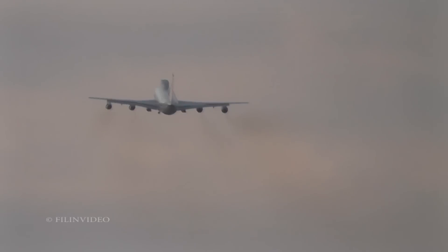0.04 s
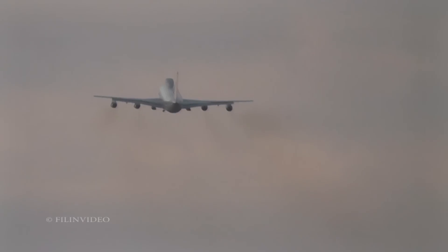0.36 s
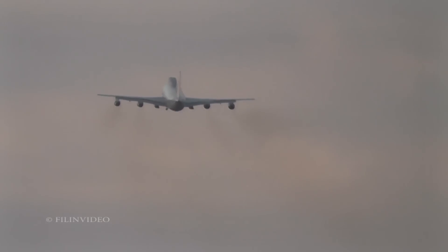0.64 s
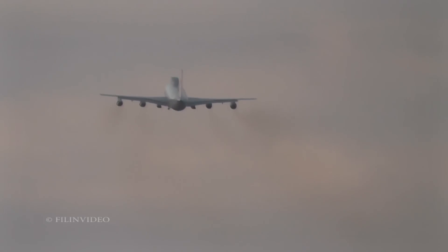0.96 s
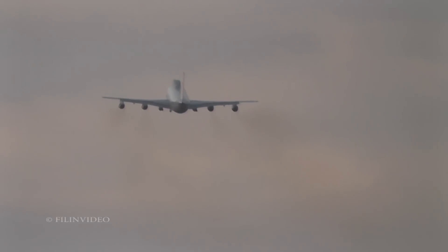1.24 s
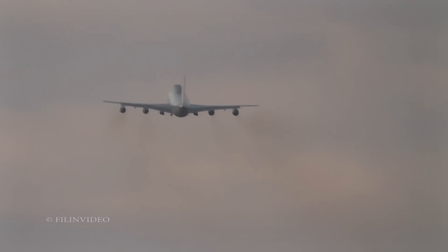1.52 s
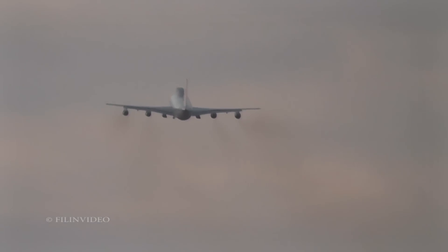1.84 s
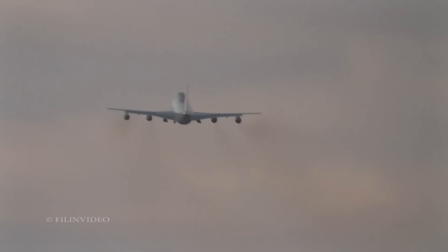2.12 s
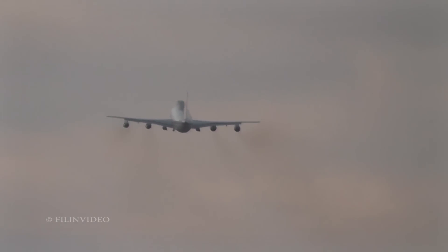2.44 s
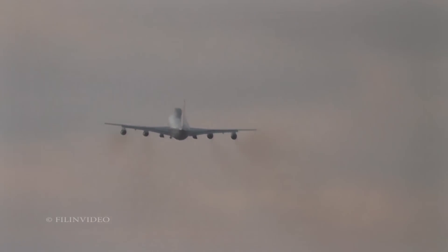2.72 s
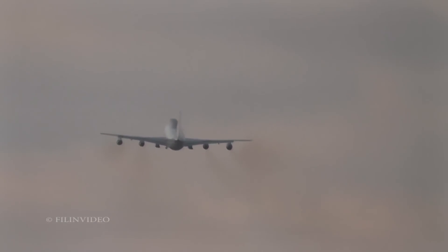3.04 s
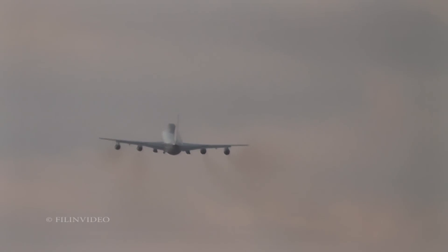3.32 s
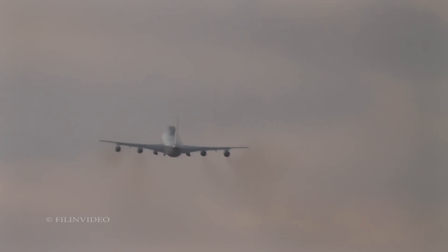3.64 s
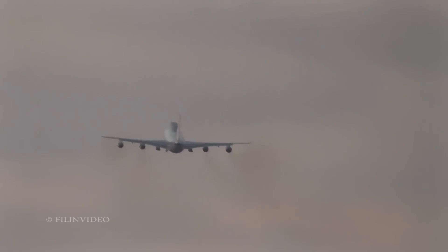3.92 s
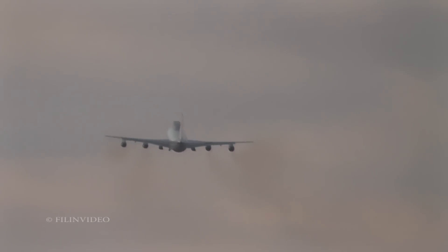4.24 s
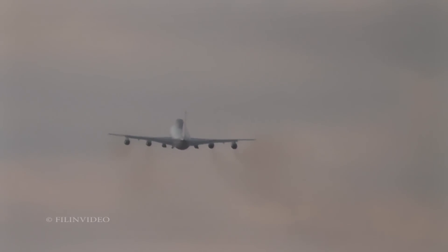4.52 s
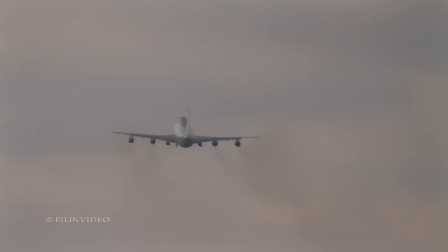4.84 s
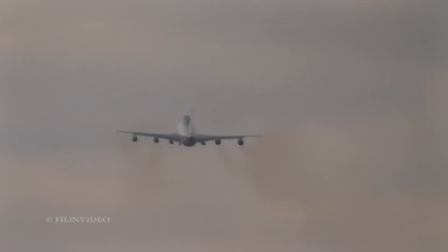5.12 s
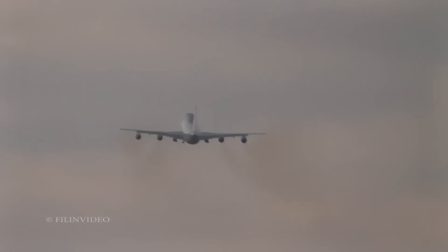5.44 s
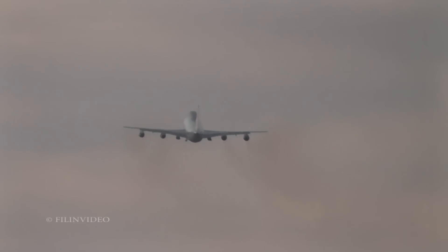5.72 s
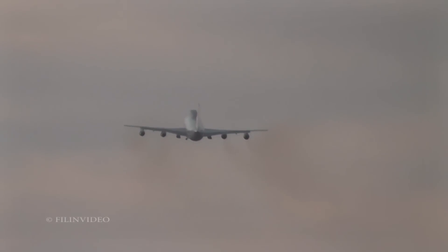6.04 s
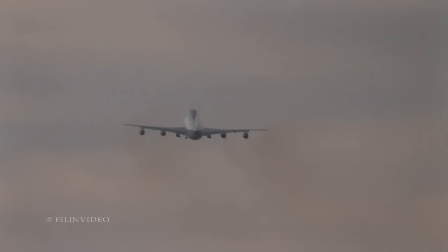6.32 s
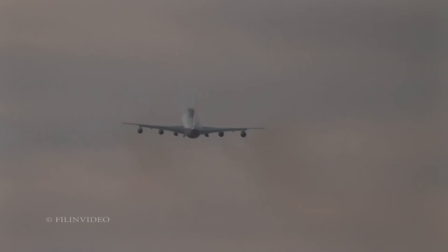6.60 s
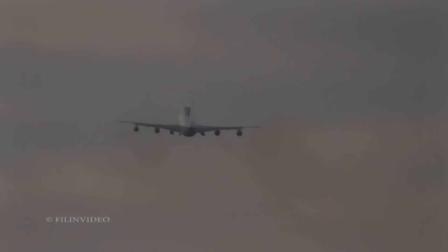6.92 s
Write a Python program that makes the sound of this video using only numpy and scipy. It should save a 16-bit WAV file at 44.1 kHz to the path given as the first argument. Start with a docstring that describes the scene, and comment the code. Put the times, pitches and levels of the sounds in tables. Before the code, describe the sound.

Gusts thump the microphone as a far-off airliner climbs away, its low roar and hollow howls gradually fading.

```python
"""A four-engine jet climbs away, far off: its exhausts mix with the air, rumbling and slowly receding.
Hollow howls swell out of the roar, and late in the climb thin turbine whines come through.
Gusts of wind buffet the two microphones. Beside them a camcorder's motor buzzes, ticking its casing
once a turn, over a faint hiss. The whole sound fades down at the end."""
import sys
import numpy as np
from scipy import signal
from scipy.fft import rfft, irfft, next_fast_len
from scipy.io import wavfile
from scipy.ndimage import uniform_filter1d, map_coordinates

SR = 44100
rng = np.random.default_rng(int(sys.argv[2]) if len(sys.argv) > 2 else 0)


def output_pcm(signal):
    """Save a mono or channel-first signal as 16-bit PCM at the path in sys.argv[1].

    Samples are clipped to [-1, 1] before scaling.
    """
    pcm = np.clip(np.atleast_2d(signal).T, -1, 1) * 32767
    wavfile.write(sys.argv[1], SR, np.round(pcm).astype(np.int16))


N = 307377
TIME = np.arange(N) / SR
FREQ = np.maximum(np.fft.rfftfreq(2 * next_fast_len(N // 2 + 1), 1 / SR), 1)


def undb(db):
    """Turn decibels into a number to multiply by."""
    return 10 ** (np.asarray(db) / 20)


def unit(x):
    """Scale a signal to an average (rms) size of 1."""
    return x / np.sqrt(np.mean(x ** 2))


def over_time(rows):
    """Read a (time, value) table at every sample."""
    return np.interp(TIME, *np.transpose(rows))


def over_frequency(rows):
    """Read a (frequency, value) table at every frequency."""
    hz, value = np.transpose(rows)
    return np.interp(np.log(FREQ), np.log(hz), value)


def colour(rows):
    """Make a filter from a (frequency, level) table, falling steeply beyond its ends."""
    outside = np.minimum(FREQ / rows[0][0], 1) * np.minimum(rows[-1][0] / FREQ, 1)
    return undb(over_frequency(rows)) * outside ** 4


def resonance(hz, width_hz):
    """A filter that rings at one pitch: the narrower, the longer."""
    return 1 / (1 + 1j * (FREQ ** 2 - hz ** 2) / (FREQ * width_hz))


def filtered(x, response):
    """Pass a sound through a filter."""
    return irfft(rfft(x, 2 * (len(FREQ) - 1)) * response)[..., :N]


def noise(stereo=False):
    """White noise; in stereo each side gets its own."""
    return rng.standard_normal((2, N) if stereo else N)


def wander(rate_hz):
    """A smooth random wobble of size 1 that changes about rate_hz times a second."""
    return unit(filtered(noise(), 1 / (1 + (FREQ / rate_hz) ** 2) ** 2))


def envelope(start_s, length_s, rise_s, fall_s):
    """Rise from 0 to 1, hold, and fall back to 0 at the end of the length."""
    return np.clip(np.minimum((TIME - start_s) / rise_s, (start_s + length_s - TIME) / fall_s), 0, 1)


def swells(rows, rise_s, fall_s):
    """Add up (start, length, level) rows into one loudness curve."""
    return sum(undb(db) * envelope(start, length, rise_s, fall_s) for start, length, db in rows)


def hiss():
    """Faint hiss with short swells of high fizz, both partly shared by the two microphones."""
    # tone colours of the hiss and the fizz: (frequency [Hz], level [dB])
    hiss_colour = [(2000, 2), (6000, 2.5), (7700, -4.5), (8500, 1), (9500, -5.5), (10500, -19),
                   (13000, -15), (15500, -19)]
    fizz_colour = [(5500, -14.5), (8000, 7), (9200, 3), (10800, -13), (14000, -15)]
    # swells of fizz: (start [s], length [s], level [dB])
    fizzes = [(0.18, 0.65, -68), (1.42, 0.4, -69), (1.93, 0.55, -60.5), (3.1, 0.45, -67)]
    steady = unit(filtered(noise(stereo=True) + noise(), colour(hiss_colour)))
    fizz = unit(filtered(noise(stereo=True) + noise(), colour(fizz_colour)))
    return steady * undb(-58.5) + fizz * swells(fizzes, rise_s=0.11, fall_s=0.2)


def ringing(x, modes):
    """A shaken object rings at its own pitches (modes) and gives off little outside their range."""
    body = sum(undb(db) * resonance(hz, width) for hz, width, db in modes)
    band = colour([(modes[0][0], 0), (modes[-1][0], 0)]) ** 2
    return unit(filtered(x, body * band))


def bearing(phase, pressure, turn_samples):
    """The motor's bearing rubs: it rasps, rings small parts, and shimmers in one narrow band."""
    # ringing of the camcorder's small parts: (pitch [Hz], width [Hz], level [dB])
    part_modes = [(2785, 30, -6.5), (2974, 26, -3.5), (3090, 42, -0.5), (3282, 60, -2.5), (3350, 70, -5),
                  (3635, 22, -2), (3790, 30, -4), (4130, 60, 0), (4205, 50, -2), (4340, 50, -4.5),
                  (4405, 60, -2), (4660, 140, -6), (4898, 20, -0.5), (5315, 18, -5), (5440, 30, -7),
                  (6490, 50, -11)]
    # tone colours of the broad rasp and its shimmer: (frequency [Hz], level [dB])
    rasp_colour = [(1400, -44), (1700, 6.5), (2080, 2.5), (2250, -2), (2650, -1), (2850, 0.5), (3400, -0.8),
                   (4000, -2.5), (4250, -8.5), (4750, -5), (5150, -8), (6700, -10), (7600, -20),
                   (10500, -31)]
    shimmer_colour = [(3950, -28), (4120, 0), (4260, -1), (4420, 0), (4580, -26)]
    # moments when the shimmer flares: (start [s], length [s], level [dB])
    flares = [(0.28, 0.17, -55), (0.72, 0.18, -55), (1.55, 0.16, -55), (1.89, 0.25, -52),
              (2.46, 0.11, -54.5), (3.24, 0.17, -58), (4.44, 0.094, -53)]
    # the same rough track passes on every turn, so part of the rasp repeats
    track = rng.standard_normal(turn_samples)
    repeating = map_coordinates(track, [phase * turn_samples], mode="grid-wrap")
    rub = unit(pressure * (noise() + 0.51 * repeating))
    parts = ringing(rub, part_modes) * undb(-51)
    rasp = unit(filtered(rub, colour(rasp_colour))) * undb(-45.5)
    shimmer = unit(filtered(pressure * noise(), colour(shimmer_colour)))
    shimmer *= undb(-60) + swells(flares, rise_s=0.039, fall_s=0.039)
    return parts + rasp + shimmer * undb(1.5 * wander(14))


def motor(turns_per_s=49.0, jitter_s=0.00011, scatter_db=0.5, decay_turns=0.098, throb_db=1.03):
    """Each turn knocks the casing into ringing and starts a short rasp of the throbbing bearing."""
    # ringing of the camcorder's casing: (pitch [Hz], width [Hz], level [dB])
    casing_modes = [(1372, 14, -6), (1627, 11, -1), (1665, 11, 2), (1715, 11, -5), (1738, 12, -2),
                    (1779, 16, -6), (1813, 9, 4.5), (1847, 16, -5), (1885, 12, -1.5), (1912, 11, -0.5),
                    (1972, 16, -1.5), (1994, 12, 1), (2018, 14, -4), (2050, 14, -2), (2068, 16, -4),
                    (2118, 22, -6)]
    turns = np.cumsum(turns_per_s * (1 + 0.0015 * wander(1.0))) / SR
    knock_times = np.interp(np.arange(1, int(turns[-1])), turns, TIME)
    lateness, strength = rng.standard_normal((len(knock_times), 2)).T
    knock_samples = np.clip((knock_times + jitter_s * lateness) * SR, 0, N - 1).astype(int)
    knocks = unit(np.bincount(knock_samples, undb(scatter_db * strength), N))
    phase = turns % 1  # runs from 0 to 1 in each turn
    # load on the bearing: a steady part plus a short push every turn
    pressure = 0.69 + uniform_filter1d(np.exp(-phase / decay_turns), size=150)
    pressure *= undb(0.61 * wander(30) + throb_db * np.sin(2 * np.pi * phase))
    rubbing = bearing(phase, pressure, int(SR / turns_per_s))
    casing = ringing(knocks + unit(pressure * noise()), casing_modes) * undb(-44)
    # the body carries it to both microphones, a little more to the right
    return casing * undb([[-1.2], [0.9]]) + rubbing * undb([[-0.3], [0.2]])


def wind(sink_db_per_s=1.0):
    """Swirls of air hit each microphone separately, in gusts with a dying breeze between them."""
    # gusts: (start [s], length [s], strength [dB])
    gusts = [(0.014, 0.12, -29.5), (0.802, 0.36, -33.5), (1.303, 0.16, -25), (1.461, 0.085, -25.5),
             (1.68, 0.11, -22), (1.81, 0.17, -28.5), (2.098, 0.37, -31), (2.832, 0.47, -31),
             (3.269, 0.298, -26.5), (3.958, 0.18, -31), (4.996, 0.12, -35), (6.306, 0.098, -31)]
    # tone colours of the low buffeting and the brighter flutter: (frequency [Hz], level [dB])
    buffet_colour = [(22, -29), (43, -18.5), (65, -2.5), (100, -2), (150, -3), (250, -2.5), (400, -12),
                     (700, -35.5), (1400, -40)]
    flutter_colour = [(140, -8), (260, -3.5), (400, 5.5), (600, -8.5), (900, -24), (1400, -22), (3000, -34)]
    breeze = undb(-34.5 - sink_db_per_s * TIME)
    force = np.maximum(swells(gusts, rise_s=0.026, fall_s=0.041), breeze) * undb(0.89 * wander(24))
    buffet = unit(filtered(noise(stereo=True), colour(buffet_colour))) * undb(4)
    flutter = unit(filtered(noise(stereo=True), colour(flutter_colour))) * undb(11)
    return buffet * force + flutter * force ** 1.544  # flutter grows faster in a hard gust


def far_noise(response):
    """Churning air heard from far off; echoes from the ground make the two microphones differ."""
    # how alike the two sides are: (frequency [Hz], likeness [1 or more = same, -1 = opposite])
    likeness_rows = [(30, 1.5), (70, 1.1), (150, 1), (400, 1), (620, 0.8), (850, 0.6), (1150, 0.07),
                     (1450, 0.43), (2000, -0.6), (5000, 2)]
    # which side is louder: (frequency [Hz], left minus right [dB])
    lean_rows = [(60, 0.5), (140, 0.5), (400, -0.5), (620, -2.5), (850, -5.5), (1400, -6.5), (2500, -11.5),
                 (6000, -6.5)]
    likeness = np.clip(over_frequency(likeness_rows), -1, 1)
    white = rng.standard_normal((2, len(FREQ))) + 1j * rng.standard_normal((2, len(FREQ)))
    mid, side = white * response * np.sqrt([1 + likeness, 1 - likeness])
    lean_db = over_frequency(lean_rows) / 2
    pair = irfft(np.array([mid + side, mid - side]) * undb([lean_db, -lean_db]))[:, :N]
    return pair / np.std(pair.mean(axis=0))


def evened(pair, steadiness):
    """Even out a noise's slow swings in loudness, from not at all (0) to fully (1)."""
    power = uniform_filter1d(pair.mean(axis=0) ** 2, size=2000)
    pair = pair / np.maximum(power, 1e-6) ** (steadiness / 2)
    return pair / np.std(pair.mean(axis=0))


def far_tone(hz, width_hz):
    """A wavering tone: distant noise ringing around one pitch."""
    return evened(far_noise(resonance(hz, width_hz) ** 2), steadiness=0.71)


def turbine_whine(hz, waver_hz=2.22, flicker_db=2):
    """One thin turbine tone, a little to the right; moving air makes its pitch and level flutter."""
    phase = 2 * np.pi * np.cumsum(hz + waver_hz * wander(20)) / SR
    return unit(np.sin(phase) * undb(flicker_db * wander(22))) * undb([[-2], [2]])


def engine_tones():
    """The engines hum faintly throughout, while hollow howls and turbine whines come and go."""
    # lasting hums: (pitch [Hz], width [Hz], level [dB])
    hum_rows = [(76.7, 13, -41), (390.3, 64, -39), (924, 14, -52)]
    # howls in the jet noise: (start [s], length [s], pitch [Hz], width [Hz], level [dB])
    howl_rows = [(0.0, 1.5, 693, 140, -39), (0.0, 0.98, 249, 80, -32), (0.33, 1.2, 402.8, 28, -29.3),
                 (0.6, 2.1, 540, 90, -40), (1.396, 1.59, 387.6, 34, -28.5), (2.3, 1.02, 471, 80, -37),
                 (5.5, 1.46, 371.6, 70.4, -33.5), (5.42, 0.8, 826, 45, -44.5)]
    # the three turbine tones: (name, pitch [Hz])
    whine_hz = {"low": 759, "middle": 819, "high": 926}
    # when they come through: (start [s], length [s], name, level [dB])
    whine_rows = [(4.15, 0.35, "low", -47), (4.22, 0.24, "middle", -41.5), (5.72, 0.29, "high", -43.5),
                  (5.98, 0.25, "high", -42.5), (6.27, 0.38, "high", -47.5), (6.3, 0.6, "middle", -46)]
    hums = sum(far_tone(hz, width) * undb(db) for hz, width, db in hum_rows)
    howls = sum(far_tone(hz, width) * undb(db) * envelope(start, length, 0.13, 0.13)
                for start, length, hz, width, db in howl_rows)
    whines = sum(turbine_whine(whine_hz[name]) * undb(db) * envelope(start, length, 0.041, 0.08)
                 for start, length, name, db in whine_rows)
    return hums + howls + whines


def exhaust_surges():
    """The exhaust's sound surges as it comes through uneven air."""
    # surges: (start [s], length [s], level [dB])
    surges = [(0.038, 0.22, -26), (1.115, 0.11, -19), (1.248, 0.16, -19), (1.445, 0.13, -18.5),
              (1.717, 0.23, -23), (1.94, 0.13, -20), (2.073, 0.25, -24), (2.845, 0.24, -22.5),
              (3.076, 0.16, -22.5), (3.293, 0.25, -20.5), (3.664, 0.27, -25), (4.002, 0.18, -27.5),
              (5.02, 0.15, -27.5), (6.196, 0.25, -25)]
    # their tone colour: (frequency [Hz], level [dB])
    surge_colour = [(85, -16.5), (110, -6), (135, 2), (175, 1), (215, -0.5), (255, -6.5), (330, -12.5)]
    low_noise = evened(far_noise(colour(surge_colour)), steadiness=0.54)
    return low_noise * swells(surges, rise_s=0.023, fall_s=0.029)


def jet_exhaust(rumble_sink_db_per_s=0.49, rush_sink_db_per_s=0.375):
    """Big swirls of exhaust rumble, smaller ones roar and rush; all grow quieter with distance."""
    # tone colours, from low to high: (frequency [Hz], level [dB])
    rumble_colour = [(22, -33.5), (32, -20.5), (41, -15.5), (53, -15), (68, -12.5), (86, -10), (104, 0),
                     (132, 1.5), (160, 1), (205, .5), (250, -3.5), (300, -8.5), (390, -33.5)]
    roar_colour = [(200, -30.5), (260, -11.5), (300, -1.5), (345, -2), (385, -1.5), (440, -3.5), (500, -8),
                   (570, -11), (680, -20.5), (900, -57)]
    rush_colour = [(450, 1), (580, -2), (660, -1.5), (740, 1.5), (830, 0), (930, -3), (1030, -7),
                   (1200, -9.5), (1450, -11.5), (2200, -23.5), (3500, -25), (7000, -39)]
    # the roar drops as the jet draws away, with small recoveries: (time [s], level [dB])
    roar_level = [(0, -24), (2.0, -26), (2.85, -26), (3.0, -28.5), (3.48, -27), (3.65, -29), (4.3, -30),
                  (5.25, -31.5), (5.45, -29.5), (5.9, -32.5), (6.5, -31)]
    # moving air makes each level waver, faster for the smaller swirls
    rumble = far_noise(colour(rumble_colour))
    rumble *= undb(-22.5 - rumble_sink_db_per_s * TIME + 0.41 * wander(15))
    roar = far_noise(colour(roar_colour))
    roar *= undb(over_time(roar_level) + 0.59 * wander(21))
    rush = far_noise(colour(rush_colour))
    rush *= undb(-33 - rush_sink_db_per_s * TIME + 0.93 * wander(28))
    return rumble + roar + rush


def scene():
    """The far jet, the wind on the microphones and the camcorder's own noises."""
    return exhaust_surges() + jet_exhaust() + engine_tones() + wind() + motor() + hiss()


def record(dry, edge_s=0.01, top_hz=15720):
    """The sound opens quickly, fades down at the end and has its highest treble cut off."""
    # closing fade: (time [s], level [dB])
    closing_fade = [(6.17, 0), (6.31, -2.5), (6.55, -4), (6.97, -8)]
    fade = envelope(0, N / SR, edge_s, edge_s) * undb(over_time(closing_fade))
    treble_cut = signal.ellip(10, 0.1, 80, top_hz, fs=SR, output="sos")
    return signal.sosfilt(treble_cut, dry * fade)


dry = scene()
out = record(dry)
output_pcm(out)
```